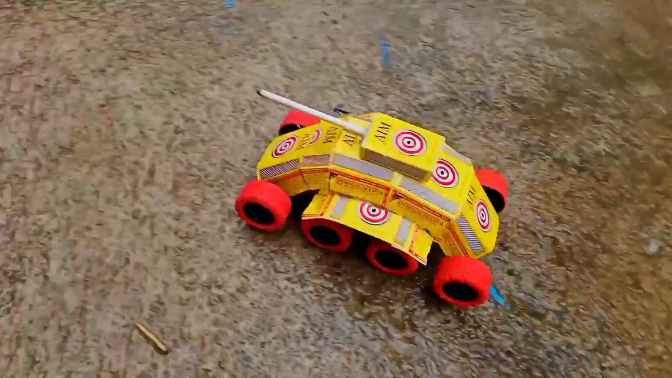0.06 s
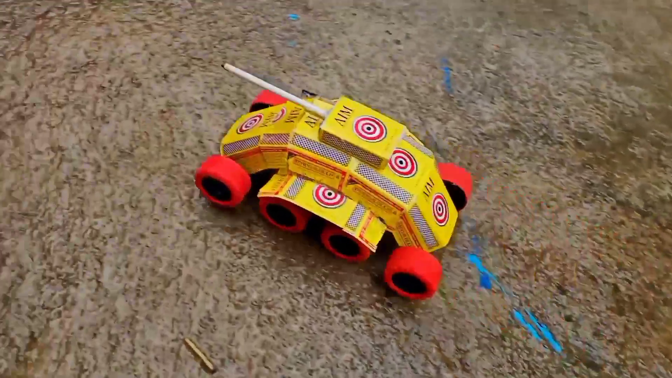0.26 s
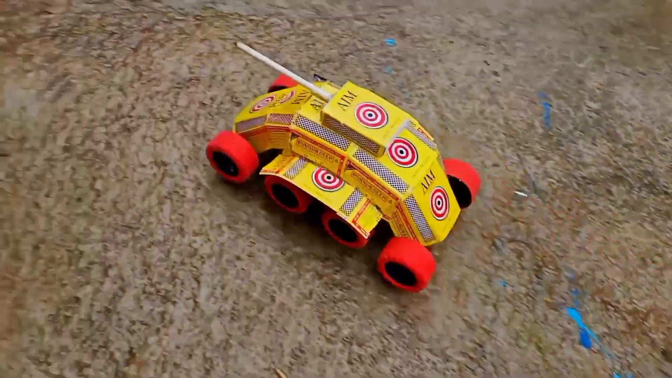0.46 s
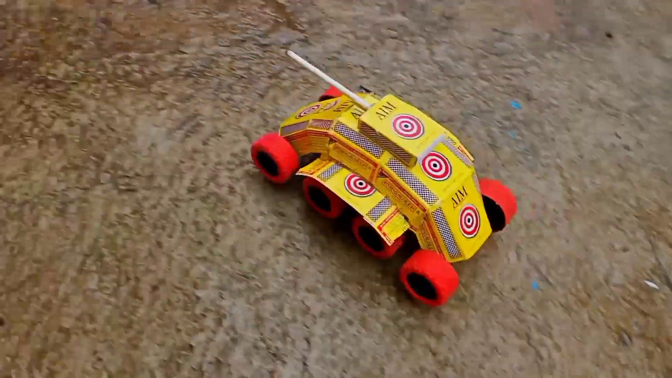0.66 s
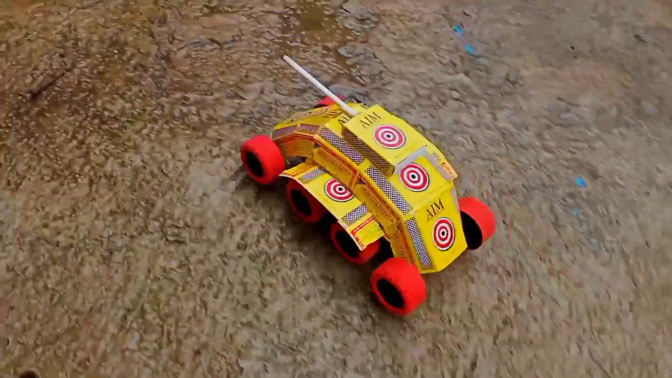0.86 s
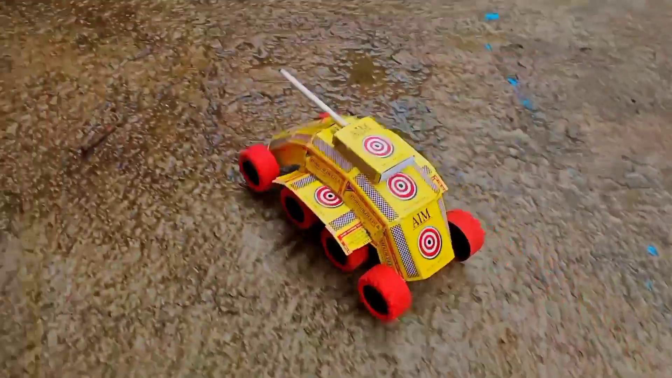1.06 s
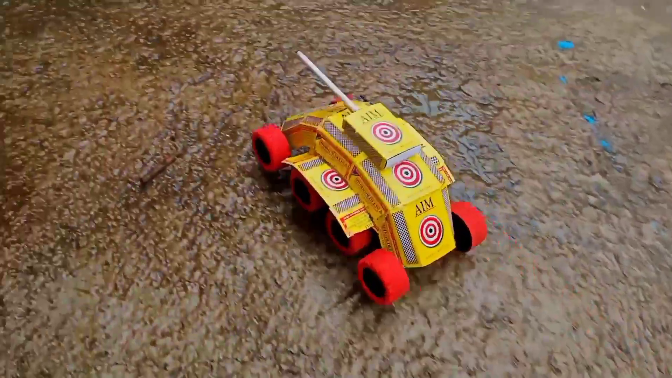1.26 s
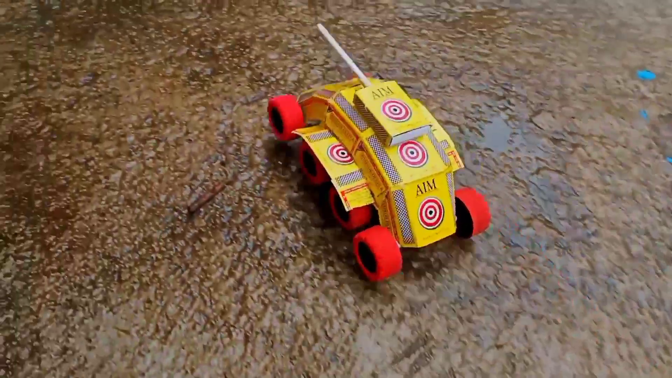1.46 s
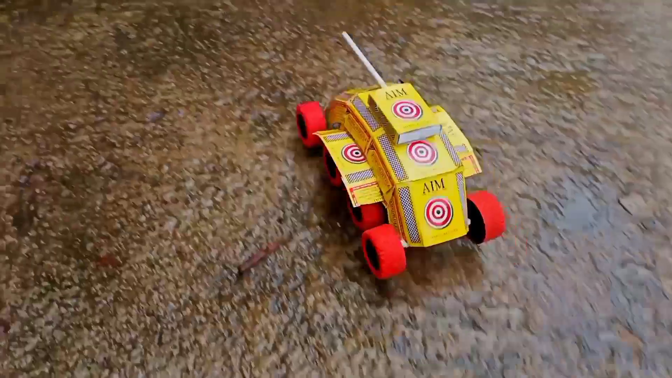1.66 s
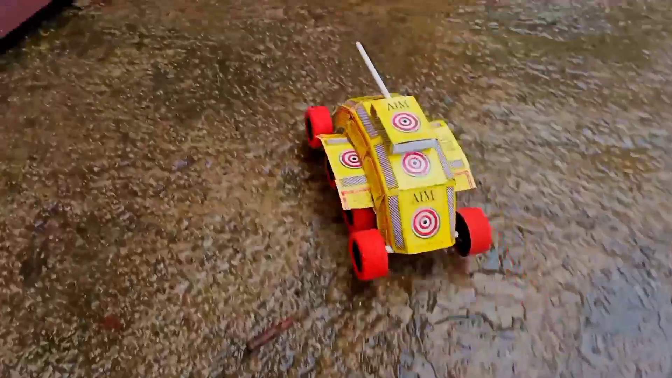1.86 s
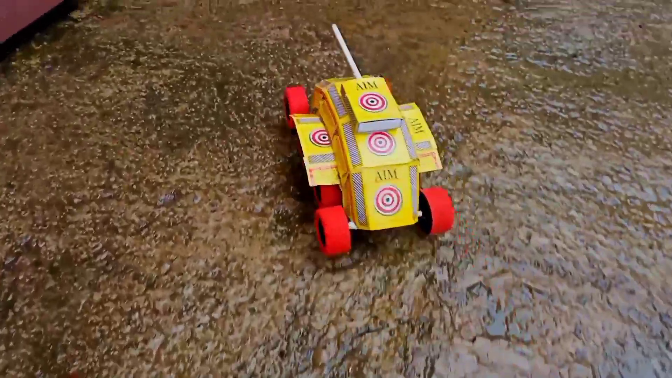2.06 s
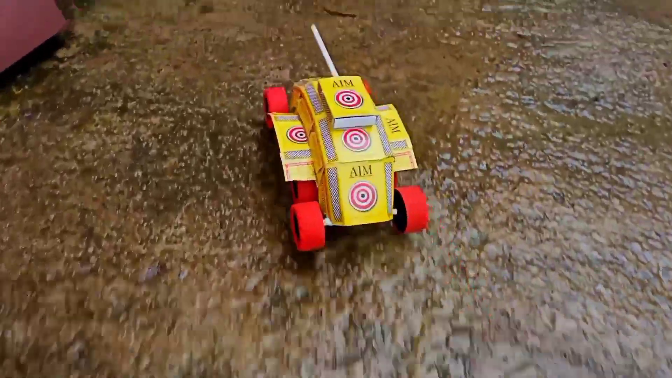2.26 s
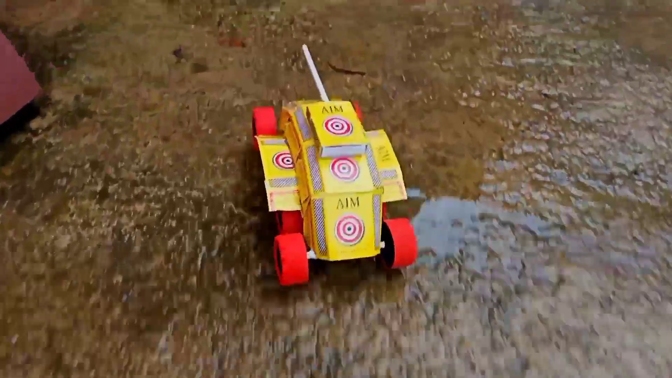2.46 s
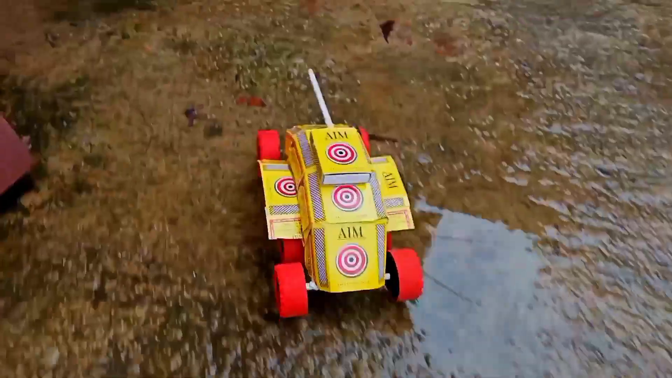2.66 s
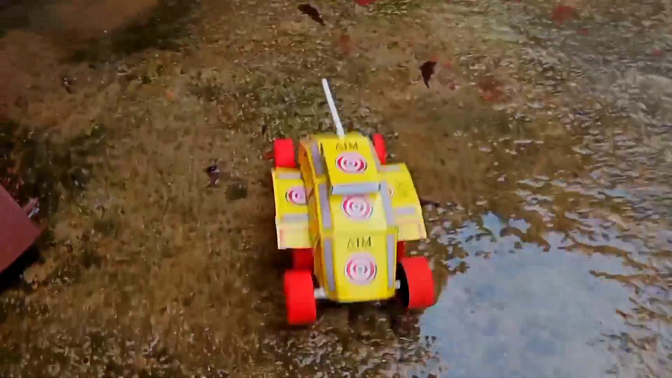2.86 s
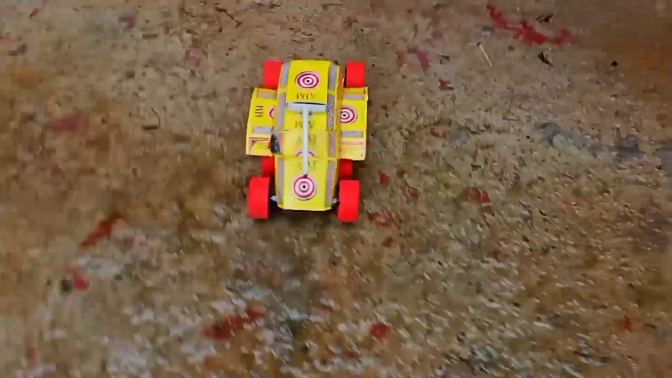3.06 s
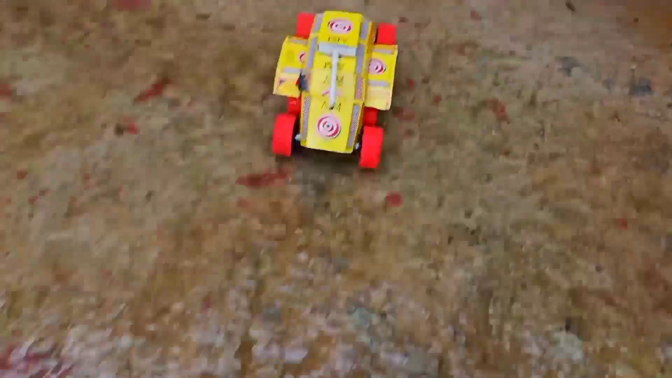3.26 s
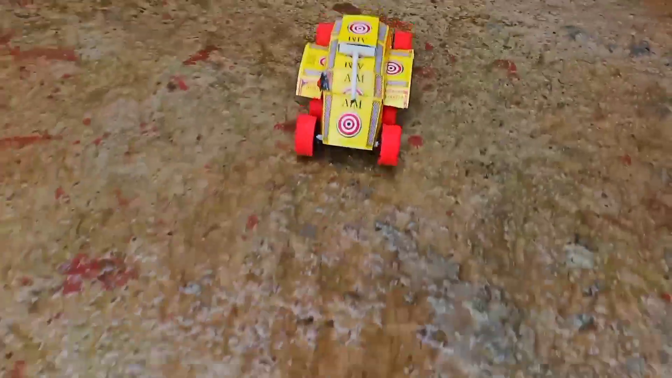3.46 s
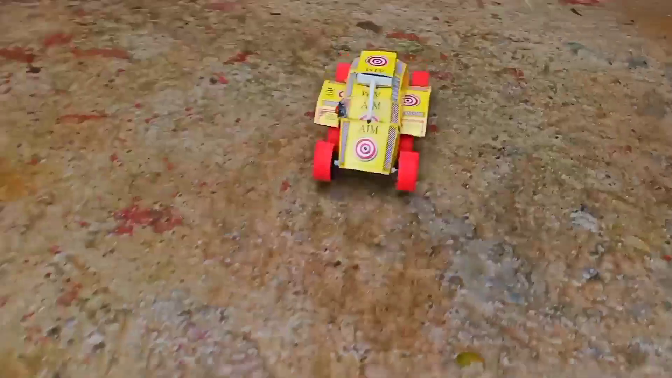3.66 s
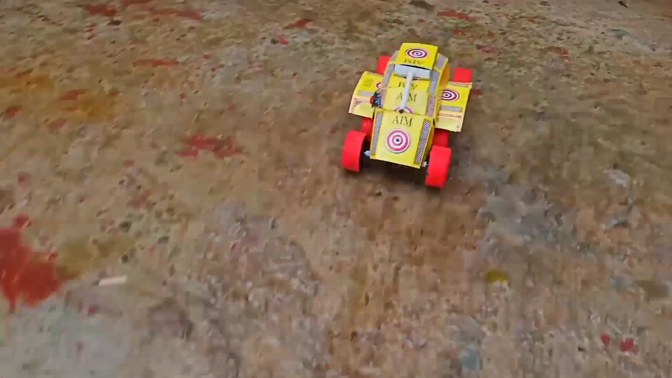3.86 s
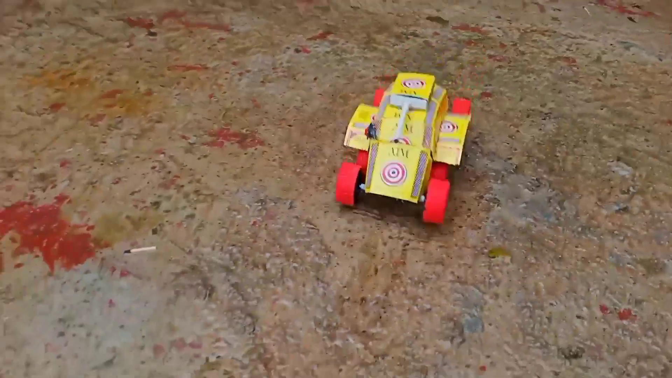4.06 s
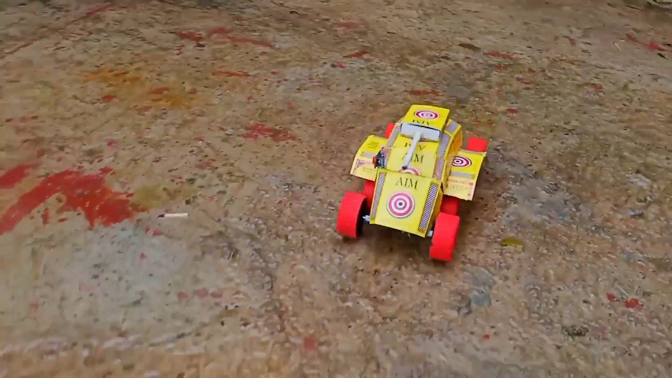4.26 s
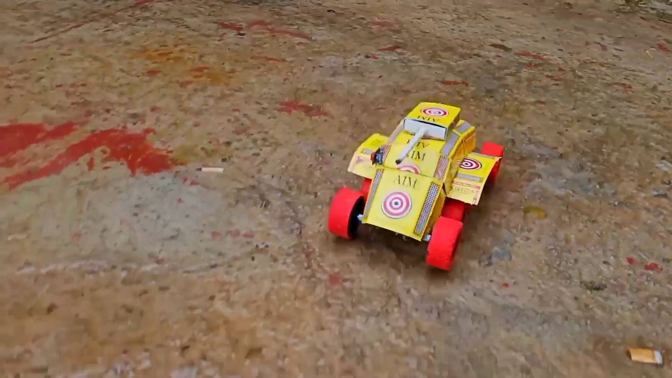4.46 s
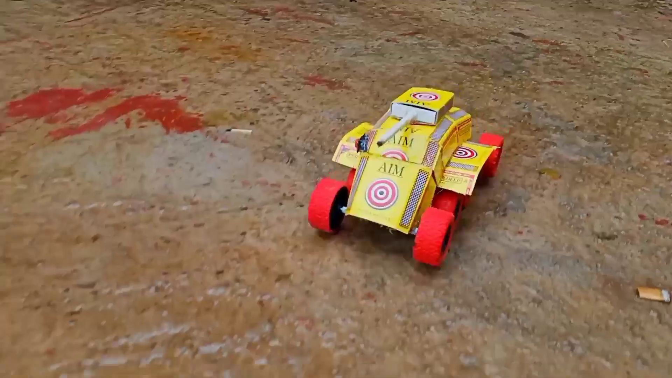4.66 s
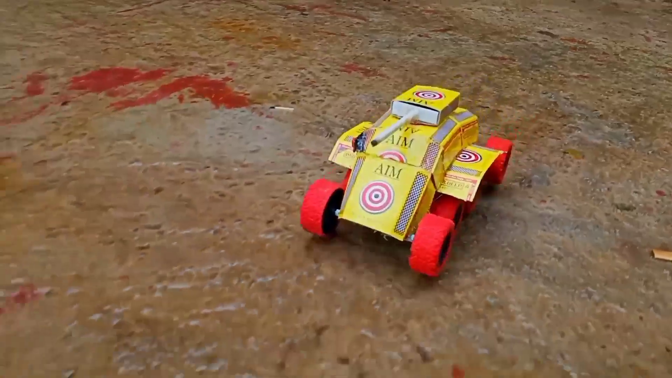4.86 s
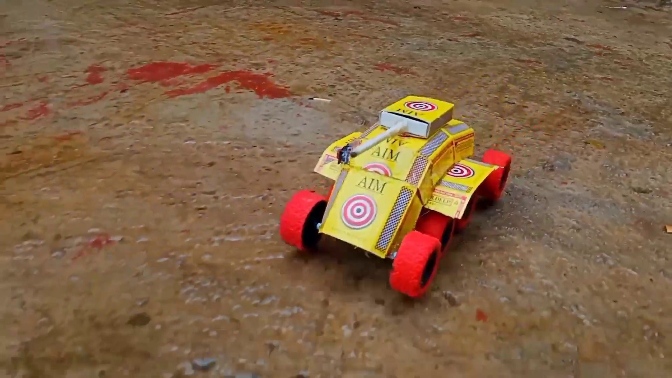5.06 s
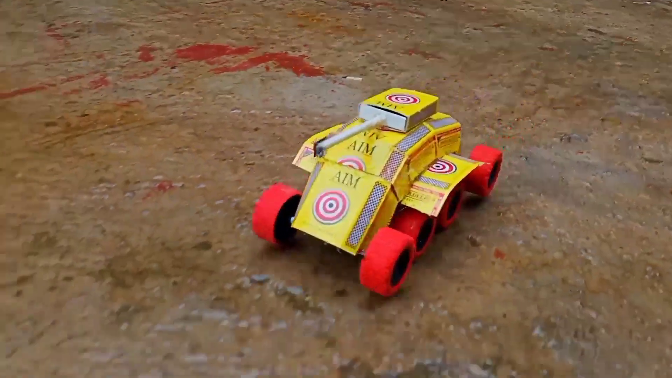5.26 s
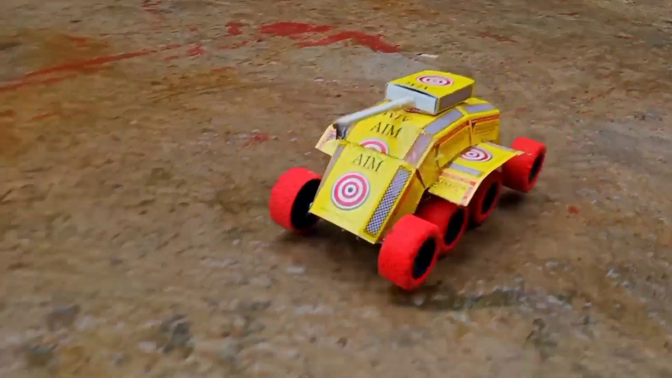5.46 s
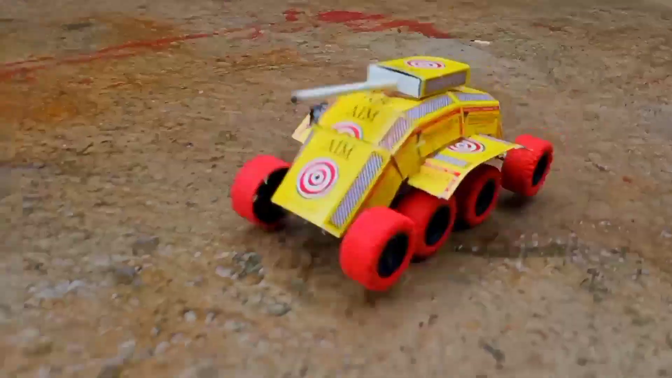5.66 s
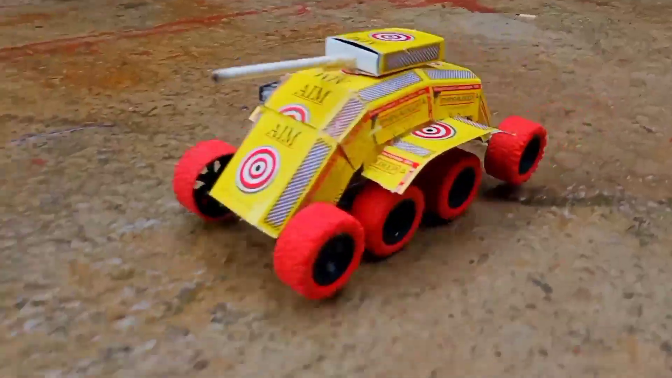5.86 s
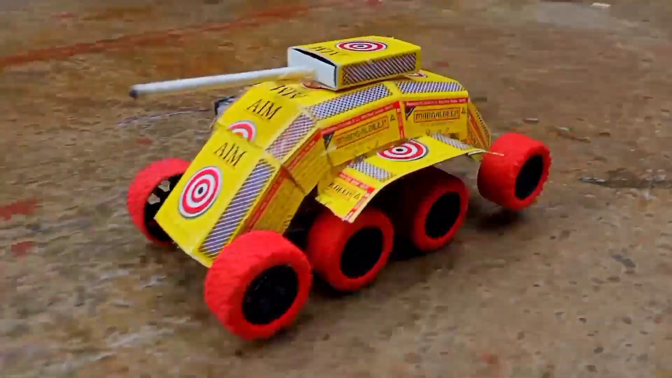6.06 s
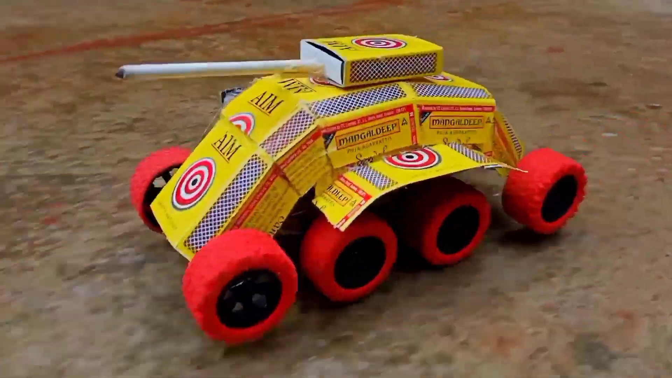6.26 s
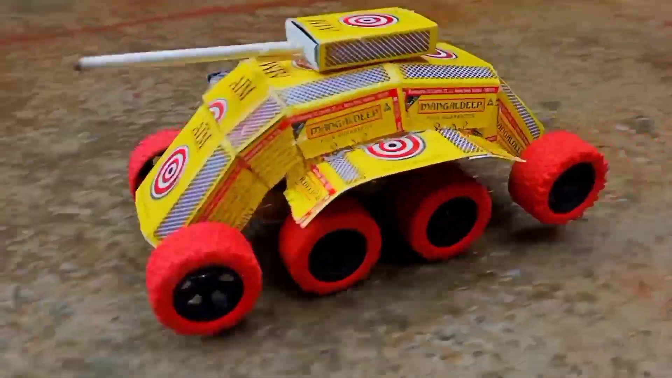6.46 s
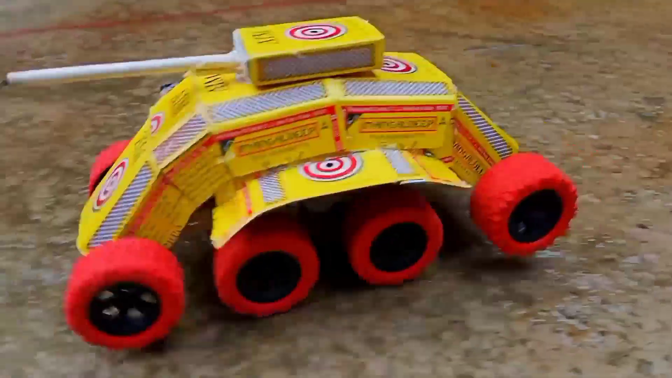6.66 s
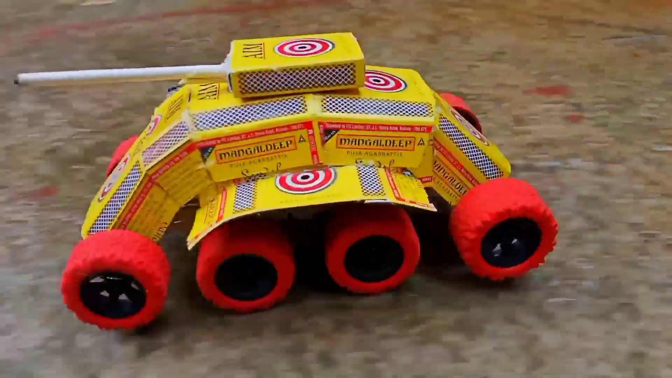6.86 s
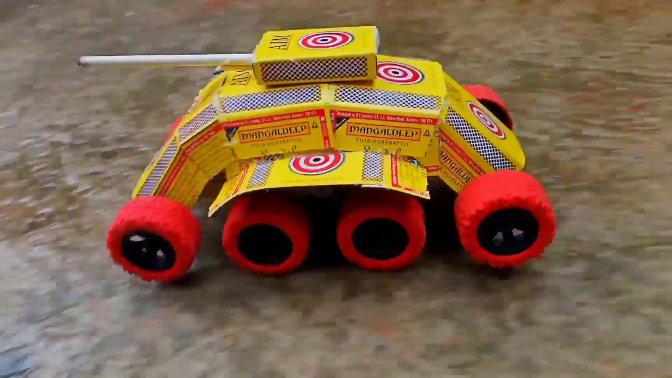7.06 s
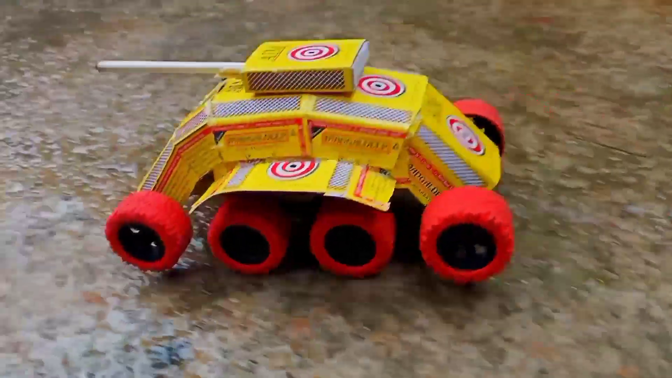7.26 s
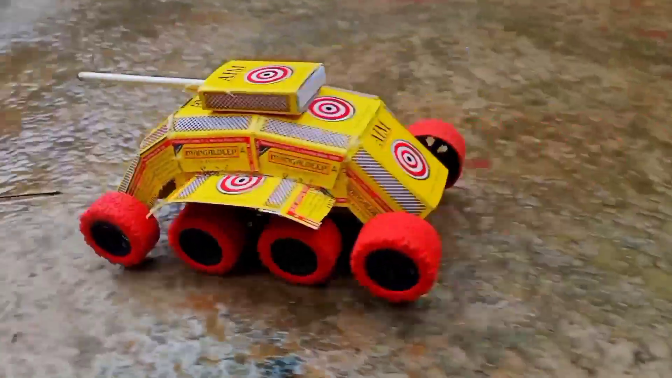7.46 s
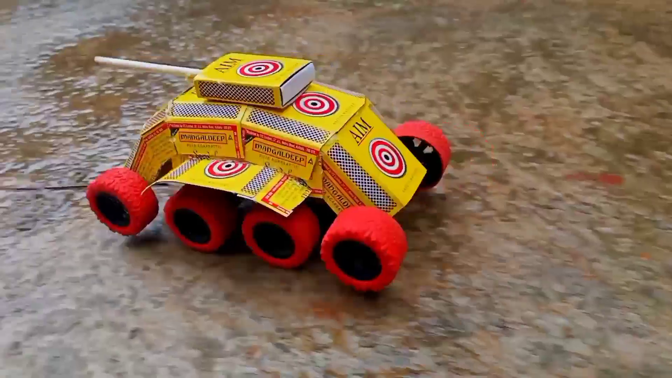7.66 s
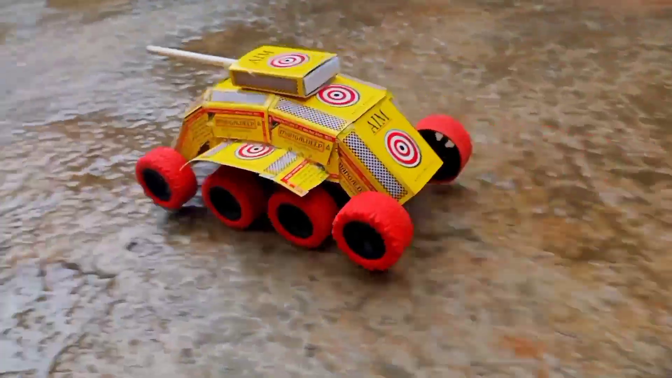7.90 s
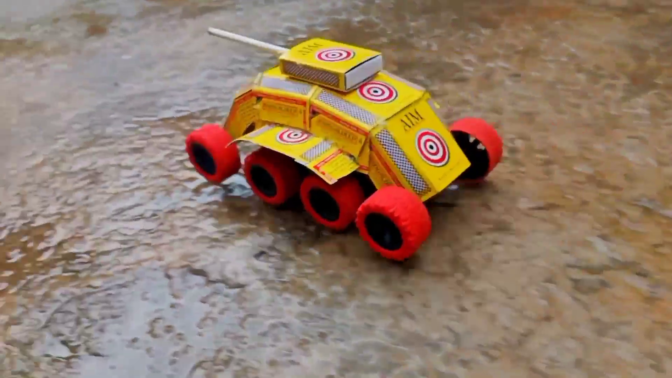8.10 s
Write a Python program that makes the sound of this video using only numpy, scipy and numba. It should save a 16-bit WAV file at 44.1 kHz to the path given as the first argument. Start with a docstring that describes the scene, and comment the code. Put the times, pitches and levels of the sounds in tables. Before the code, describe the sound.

A small toy vehicle runs continuously over rough, damp concrete, its plastic gears making a grainy, fluttering buzz inside a hollow cardboard body, with low lumpy wheel rumble beneath. From 0 to 1.2 seconds the rattle is moderate and brighter, with light knocks and a soft thump near 0.35. A sharp bump at 1.2 brings a brief dip; the rattle recovers duller, with another tap near 1.85. Around 3.0 a cluster of microphone thumps and clicks precedes a sudden drop in level and a faint airy swish, fading by about 3.3. A deep thump at 3.75 and rumbling near 4 lead into a steady approach, with small bumps through 5.3. From 5.8 to 7.1 the rattle is loud and close, crowded with hard plastic knocks, peaking around 6.4. It then eases gradually, still running when it stops at 8.1. Dry, close hand-held microphone.

```python
"""Cardboard toy vehicle on concrete

A cardboard toy vehicle rolls over concrete, followed closely by a hand-held microphone.
Plastic gears rattle in bursts: random tooth contacts, loaded in step with two shafts, ring body resonances.
Hard knocks stand out of the rattle. Filtered noise makes the wheel rumble and one brief airy swish;
dying sines make the hand's bumps on the microphone housing."""
import sys
import numpy as np
from scipy import signal
from scipy.io import wavfile
from numba import njit

SR = 44100
rng = np.random.default_rng(int(sys.argv[2]) if len(sys.argv) > 2 else 0)


def store_pcm(level_fs):
    """Save levels as 16-bit WAV."""
    pcm = np.round(np.clip(level_fs, -1, 1) * 32767).astype(np.int16)
    wavfile.write(sys.argv[1], SR, np.atleast_2d(pcm).T)


N = 358533


def from_db(db):
    """Decibels to gain."""
    return 10 ** (np.asarray(db) / 20)


def rms_one(x):
    """Scale to rms 1."""
    return x / np.sqrt(np.mean(x ** 2) + 1e-20)


def in_time(rows):
    """Columns of a curve after its time column, one value per sample."""
    knot_s, *columns = np.transpose(rows)
    return [np.interp(np.arange(N) / SR, knot_s, column) for column in columns]


def drift(rate_hz):
    """Slow chance: noise at every 16th sample through a double one-pole low-pass; spread 1."""
    settle = 3000
    r = np.exp(-2 * np.pi * rate_hz * 16 / SR)
    noise = rng.standard_normal(N // 16 + 2 + settle)
    slow = signal.lfilter([1], [1, -2 * r, r * r], noise)[settle:]
    return np.interp(np.arange(N) / 16, np.arange(len(slow)), rms_one(slow - slow.mean()))


def band(x, low_hz, high_hz):
    """Butterworth band-pass."""
    return signal.sosfilt(signal.butter(2, [low_hz, high_hz], "band", fs=SR, output="sos"), x)


@njit
def two_pole(x, r, cos_w):
    """Resonator loop whose centre may change at every sample."""
    y = np.zeros_like(x)
    for i in range(2, len(x)):
        drive = (1 - r * r) / 2 * (x[i] - x[i - 2])
        y[i] = drive + 2 * r * cos_w[i] * y[i - 1] - r * r * y[i - 2]
    return y


def resonate(x, hz, width_hz):
    """A resonance rung twice, which keeps the valleys dark; hz is a number or one value per sample."""
    r = np.exp(-np.pi * 1.6 * width_hz / SR)  # each pass 1.6 times as wide: two passes narrow the peak
    cos_w = np.cos(2 * np.pi * hz / SR) * np.ones(N)
    return two_pole(two_pole(x, r, cos_w), r, cos_w)


def gears():
    """Uneven tooth contacts ring every resonance of the body; each one flickers on its own."""
    # Resonances in groups, from the hull up to the fizz of the teeth.
    # Each row: centre in Hz or name of a sliding peak, nominal width in Hz, level within the group in dB.
    resonance_groups = [
        [(795, 580, -7), ("hull", 166, 0), (1048, 290, -3.5)],
        [(1447, 172, -1.2), ("box", 170, 0), (1836, 207, -3.5), (2124, 400, -4.5)],
        [(2545, 230, 0.045), ("gearbox", 165, 0), (2755, 245, -5), (2932, 235, -0.5)],
        [(3400, 280, 7.5), (3565, 530, 4), (4080, 130, -11.5), (4100, 240, -20)],
        [(4800, 600, -3), ("pinion", 110, -3.5), (5300, 500, -4), (5950, 450, -2)],
        [(6580, 220, -2.5), (6950, 180, -0.5), (7440, 580, 0)],
        [(8100, 350, -2), ("cover", 430, 0), (9000, 1200, -2.5)],
        [("axle", 610, 0), (10440, 940, 0)],
        [(11100, 430, -7), (11400, 1100, -3)],
        [(12500, 1000, -2), (13600, 550, -6), (14400, 800, -5), (15200, 800, -13)],
    ]
    body_groups = 4  # the lower groups belong to the cardboard, which passes no treble
    treble_bite = 0.24  # the fizz of the teeth swells more steeply with load than the body does
    contacts_per_s = 9000

    level, groups_db, sliding_hz, focus_db = view()
    blow, swell = knocks()
    load_db = tooth_load(slow_db=3.0, fast_db=3.0, chance_db=0.5, surge_db=1.09)
    load = rms_one(from_db(load_db)) + swell / level  # the division keeps knocks free of the rattle level

    # four meshing points, one for each resonance of a group
    sizes = from_db(2.7 * np.minimum(rng.exponential(1, (4, N)), 5))
    sizes = sizes * rng.choice([-1, 1], (4, N))
    contacts = load * rms_one(sizes * (rng.random((4, N)) < contacts_per_s / SR))

    groups = []
    for g, (group, group_db) in enumerate(zip(resonance_groups, groups_db)):
        if g < body_groups:
            struck = contacts + blow / level  # blunt blows reach only the body
        else:
            struck = contacts * load ** treble_bite
        push = from_db(1.28 * drift(100)) * struck
        rings, power = 0, 0
        for k, (hz, width_hz, ring_db) in enumerate(group):
            gain = from_db(ring_db + (hz in sliding_hz) * focus_db)
            ring = rms_one(resonate(push[k], sliding_hz.get(hz, hz), width_hz))
            flicker = from_db(1.8 * drift(9.1))
            rings = rings + gain * flicker * ring
            power = power + gain ** 2
        groups.append(from_db(group_db) * rms_one(rings / np.sqrt(power)))

    cardboard = signal.butter(8, 4150, fs=SR, output="sos")
    body = signal.sosfilt(cardboard, sum(groups[:body_groups]))
    return level * (body + sum(groups[body_groups:]))


def tooth_load(slow_db, fast_db, chance_db, surge_db):
    """Each off-centre shaft presses the teeth together once a turn; play in the gears adds chance. In dB."""
    # Motor speed. Each row: time in seconds, slow shaft speed in turns per second.
    shaft_speed = [(0.0, 71.92), (0.5, 70.82), (1.0, 71.06), (1.5, 70.54), (2.0, 71.29), (2.5, 71.75),
                   (3.0, 72.77), (3.5, 72.41), (4.0, 71.66), (4.5, 71.71), (5.0, 72.47), (5.5, 72.82),
                   (6.0, 72.05), (6.5, 71.25), (7.0, 72.82), (7.5, 73.71), (8.0, 72.49), (8.13, 73.0)]
    gear_ratio = 1.5826  # the fast shaft is geared to the slow one
    slow_start_turns, fast_start_turns = -.29, .76
    snap = 0.25  # the teeth press together faster than they let go

    turned = 2 * np.pi * np.cumsum(in_time(shaft_speed)[0]) / SR
    slow = turned + 2 * np.pi * slow_start_turns
    fast = gear_ratio * turned + 2 * np.pi * fast_start_turns
    press = 0
    for db, turn in ((slow_db, slow), (fast_db, fast)):
        press = press + db * (np.cos(turn) - snap * np.sin(2 * turn))
    depth = from_db(3.2 * np.tanh(drift(22)))
    return press * depth + chance_db * drift(74) + surge_db * drift(21)


def knocks():
    """A hard tooth knock is one blunt blow and a short swell of tooth load after it."""
    # Each row: time in seconds, relative strength in dB.
    knock_rows = [(0.4524, -14), (0.709, -4), (1.1396, -5), (1.663, -17), (1.9765, -13), (2.648, -17),
                  (3.0772, -6.5), (3.5838, -12), (4.0587, -13), (4.437, -8), (4.517, -8), (4.5865, -12),
                  (4.7568, -7), (5.1577, -3), (5.2663, -3), (5.553, -14), (5.8393, -7), (5.912, 0),
                  (5.9828, -15), (6.027, 0), (6.12, 3.5), (6.1636, 0), (6.2603, 0), (6.2711, 6.5),
                  (6.314, -4), (6.3314, -3), (6.4698, -9), (6.599, 5), (6.6092, 0), (6.695, -5),
                  (6.7476, 4), (6.7752, 6), (6.8598, 1), (7.0095, -8), (7.0925, 3), (7.19, -8),
                  (7.2685, -1), (7.423, -9), (7.476, -6), (7.5443, -16), (7.5857, 0), (7.7326, -9),
                  (7.873, -9)]
    marks, t = np.zeros(N), np.arange(SR // 50) / SR
    for start_s, strength_db in knock_rows:
        marks[round(start_s * SR)] = from_db(strength_db)
    blow = signal.sosfilt(signal.butter(1, 5000, fs=SR, output="sos"), marks)
    swell_shape = t / 0.0013 * np.exp(1 - t / 0.0009)  # crests after 0.9 ms
    swell = signal.fftconvolve(marks, swell_shape)[:N]
    return from_db(4) * blow, from_db(-16.0) * swell


def view():
    """Distance and heading shape the rattle: level, group dB against it, sliding peaks in Hz, their focus dB."""
    # Rattle at the microphone; treble and top octave act only by their swing about the mean.
    # Each row: time in seconds, level in dB, treble level in dB, top octave level in dB.
    rattle_levels = [(0.0, -25, -42, -65), (0.406, -24.5, -43.5, -58), (0.946, -26.5, -44, -56),
                     (1.16, -25, -42.5, -62), (1.185, -30, -48, -72), (1.225, -33, -50.5, -87),
                     (1.29, -27.5, -51, -74), (1.926, -27, -54, -65), (2.192, -25.5, -54, -69),
                     (2.856, -26, -53, -71), (3.06, -25.5, -53, -70), (3.1, -31.5, -49, -67),
                     (3.32, -34, -48.5, -79), (3.67, -33, -56.5, -61), (4.16, -27.5, -57.5, -72),
                     (4.54, -27, -55.5, -70), (4.74, -25, -53.5, -73), (5.2, -25, -53, -68),
                     (5.38, -24, -54, -56), (5.61, -22.5, -52, -58), (6.0, -19, -51, -61),
                     (6.41, -17.5, -53, -65), (7.2, -20, -54.5, -61), (7.48, -20.5, -57, -60),
                     (7.85, -21.5, -55.5, -63), (8.13, -23, -58, -64)]
    # Which way the vehicle points.
    # Each row: time in seconds, heading in degrees (0 nose to the microphone, 90 side on, 180 tail).
    heading_curve = [(0, 124), (1.17, 110), (1.24, 126), (3.06, 160), (3.11, 2), (4.5, 6.7), (5.5, 67),
                     (7, 81), (8.13, 122)]
    # The strongest peak of six groups; five slide with heading and treble.
    # Each entry: base in Hz, Hz gained side on, Hz gained from behind, Hz gained per dB of treble swing.
    peak_slides = {"hull": (1240, 10, -30, 0), "box": (1630, 40, 50, -17), "gearbox": (2780, 60, -200, 10),
                   "cover": (7900, 1050, 100, -45), "axle": (9850, 620, 100, -20),
                   "pinion": (5545, 0, 0, 0)}
    # How each resonance group follows the view.
    # Each row: base level in dB, share of the swing of level, of treble, of top octave,
    # dB gained side on, dB gained from behind (lost nose on).
    group_follows = [(-33.5, 0.64, 0.5, 0.079, 0.27, 0), (-27, 1.04, 0.27, 0.03, -0.42, -1.26),
                     (-28, 1.06, -0.27, 0, 0.15, -1.4), (-37.5, 0, 0.33, 0.04, -0.64, 5),
                     (-56.5, 0, 1.22, 0, 1.5, 0.9), (-54.5, 0.044, 0.95, 0.1, -3, 1),
                     (-57, -0.17, 0.58, 0.2, -2.5, -0.3), (-61, 0.25, 0.6, 0.3, -3, -1.2),
                     (-71, 0, 0.055, .7, 5.5, -1.2), (-69.5, 0, 0, 0.55, 0.5, 3)]

    level_db, treble_db, top_db = in_time(rattle_levels)
    heading = np.radians(in_time(heading_curve)[0])
    side, rear = np.sin(heading), -np.cos(heading)
    level_swing, treble_swing, top_swing = [db - db.mean() for db in (level_db, treble_db, top_db)]
    swings = np.array([level_swing, treble_swing, top_swing, side, rear])
    groups_db = [base_db + np.dot(shares, swings) - level_db for base_db, *shares in group_follows]
    slides = [side, np.maximum(rear, 0), treble_swing]
    sliding_hz = {name: hz + np.dot(gains_hz, slides) for name, (hz, *gains_hz) in peak_slides.items()}
    # the sliding peaks stand out more as the rattle gets loud and bright
    focus_db = 0.16 + 0.84 * level_swing + 0.16 * treble_swing
    return from_db(level_db), groups_db, sliding_hz, focus_db


def wheels():
    """Wheels on rough ground: lumpy low noise from the tyres on the grit."""
    # Each row: time in seconds, deep rumble level in dB, drumming level in dB.
    roll_levels = [(0.0, -53, -38.5), (0.22, -43.5, -40), (0.65, -52.5, -44), (1.09, -43, -42.5),
                   (1.61, -59, -47.5), (2.45, -62.5, -50), (3.67, -58, -47.5), (3.89, -42.5, -50),
                   (4.07, -39.5, -33.5), (4.41, -52.5, -48.5), (5.12, -40, -41), (5.5, -42.5, -44.5),
                   (5.82, -47, -46), (6.34, -44.5, -46), (6.73, -51.5, -43), (7.13, -49, -42.5),
                   (7.67, -61, -45.5), (8.13, -50.5, -48)]
    deep_db, drum_db = in_time(roll_levels)
    lumps_db = 2.4 * drift(15.0)
    deep_noise = band(rng.standard_normal(N), 65, 170)
    deep = rms_one(deep_noise * from_db(lumps_db + 2.0 * drift(11)))
    drum_noise = band(rng.standard_normal(N), 235, 545)
    drum = rms_one(drum_noise * from_db(1.36 * lumps_db + 3.2 * drift(55)))
    return from_db(deep_db) * deep + from_db(drum_db) * drum


def bumps():
    """A bump on the microphone housing is a tick on a dull thump; the deeper the thump, the slower it builds."""
    # Each row: start in seconds, thump in dB, thump pitch in Hz, cycles of ringing, tick in dB,
    # tick pitch in Hz; levels are before the filters.
    bump_rows = [ (0.344, 0.5, 187, 2.6, -12, 590), (0.357, -11, 260, 2.7, -22, 600),
                 (1.2020, 0, 644, 3.8, 8, 1440), (1.8434, -7, 400, 2.7, 1, 1300),
                 (1.8448, -1, 237, 4.4, -0.5, 626), (2.997, -3, 191, 3.1, -25, 600),
                 (3.0152, -8, 229, 8.9, 9, 1050), (3.0238, 1, 233, 3.7, 4, 600),
                 (3.0261, 6, 328, 2.7, -1, 1300), (3.0340, 0.5, 114, 4, -32, 600),
                 (3.0818, -7, 198, 2, -29, 600), (3.26, -18.5, 205, 3.7, -34, 600),
                 (3.443, -10, 93, 2, -30, 600), (3.7616, -4.5, 230, 3.4, -29, 600),
                 (3.7642, 14, 84, 2.9, -8, 500), (3.7675, -15, 566, 9.7, -22, 900),
                 (3.844, -16, 230, 3.8, -8, 1210), (3.9310, 3, 320, 1.43, -3, 690),
                 (3.95, -15.5, 111, 4.2, -27, 600), (3.9717, -9, 183, 2.6, -5.5, 600),
                 (4.0609, -5, 240, 1.9, -27, 600), (4.0768, -11, 186, 7, 8.5, 1090),
                 (4.2085, -8, 187, 4.3, 5, 1110), (4.595, -12.5, 242, 1.8, -35, 600),
                 (4.69, -11.5, 404, 2, -31, 800), (4.8936, -16, 426, 5, -25, 800),
                 (4.947, -10, 387, 5.2, -22, 800), (4.9582, -6.5, 193, 4.8, 5.5, 1300),
                 (5.0039, -8.5, 410, 5.2, -1, 2200), (5.0247, -10.5, 332, 3.3, -24, 800),
                 (5.1656, -2.5, 178, 4.6, 7.5, 1310), (5.2183, -5, 387, 3.5, -2, 800),
                 (5.2999, -19.5, 440, 7.7, -27, 800), (5.329, -13, 370, 2.2, -18, 800),
                 (5.639, -21.5, 113, 7.4, -30, 600), (6.037, -23, 81, 7.4, -32, 600),
                 (6.485, -17.5, 82, 2.7, -37, 600), (7.277, -14.5, 121, 2.9, -39, 596),
                 (7.557, -19.5, 102, 3.8, -34, 600), (7.739, -17, 160, 2, -32, 600),
                 (7.866, -20, 162, 5.5, -32, 600), (8.066, -17.5, 113, 3.7, -32, 594)]
    out, t = np.zeros(N + SR), np.arange(SR // 5) / SR
    for start_s, thump_db, thump_hz, cycles, tick_db, tick_hz in bump_rows:
        at = round(start_s * SR)
        thump = from_db(thump_db) * dying_sine(t, thump_hz, cycles, rise_s=45 / thump_hz ** 2)
        tick = from_db(tick_db) * dying_sine(t, tick_hz, 2.1, rise_s=0.25 / tick_hz)
        out[at:at + len(t)] += thump + tick
    return signal.sosfilt(signal.butter(1, 6000, fs=SR, output="sos"), out[:N])  # the housing dulls the edge


def dying_sine(t, hz, cycles, rise_s):
    """A ring that starts sharp and settles as the contact softens, 60 dB down after the given cycles."""
    turns = hz * t * (1 + .25 * np.exp(-hz * t * 1.5))
    decay = from_db(-60 * hz * t / cycles)
    rise = 1 - np.exp(-(t / rise_s) ** 2)
    ring = np.sin(2 * np.pi * turns) * decay * rise
    # the housing springs back, so no deep bass
    return signal.sosfilt(signal.butter(2, .35 * hz, "high", fs=SR, output="sos"), ring)


def swish():
    """A brief thin hiss: high band noise that swells and fades."""
    start_s, attack_s, fade_db_per_s, level_db = 3.09, .11, 90, -60
    since_s = np.arange(N) / SR - start_s
    attack = np.clip(since_s / attack_s, 0, 1)
    fade = from_db(-fade_db_per_s * np.maximum(since_s - attack_s, 0))
    hiss = rms_one(band(rng.standard_normal(N), 12800, 15600))
    return attack * fade * from_db(level_db + 1.5 * drift(40)) * hiss


def scene():
    """Gears, wheels, bumps and swish at one microphone."""
    return (gears() + wheels() + bumps() + swish())[None]


def record(dry):
    """The microphone loses the deepest bass and the top is cut."""
    stop_edge_hz, stop_db = 15850, 70
    thin = signal.sosfilt(signal.butter(3, 50, "high", fs=SR, output="sos"), dry)
    return signal.sosfilt(signal.cheby2(22, stop_db, stop_edge_hz, fs=SR, output="sos"), thin)


dry = scene()
out = record(dry)
store_pcm(out)
```